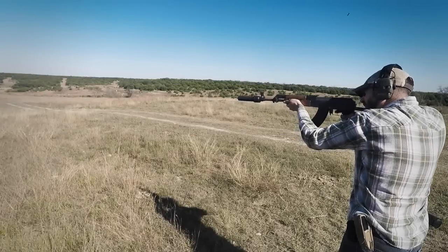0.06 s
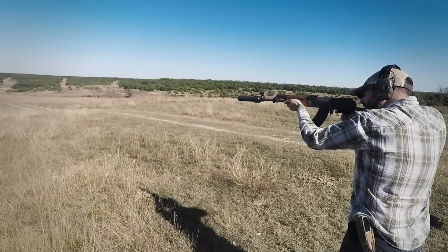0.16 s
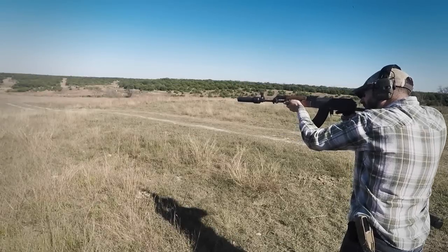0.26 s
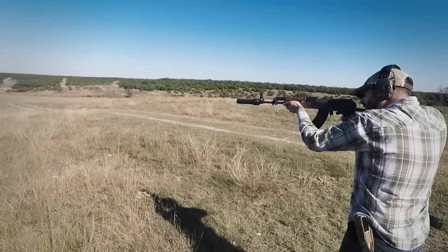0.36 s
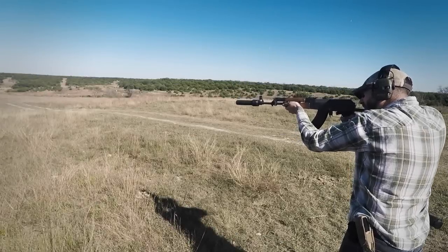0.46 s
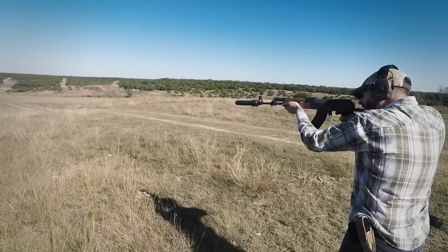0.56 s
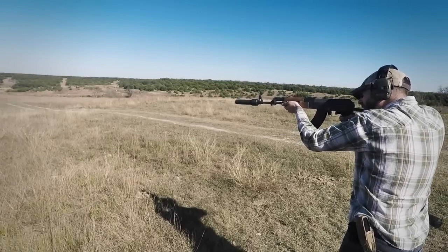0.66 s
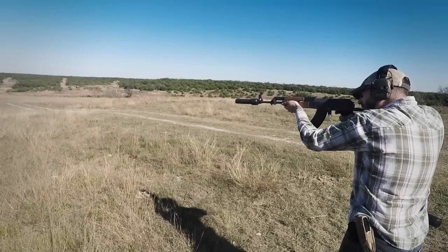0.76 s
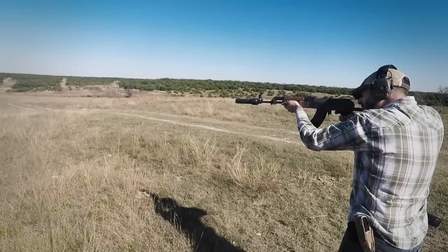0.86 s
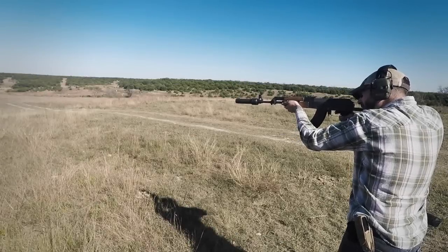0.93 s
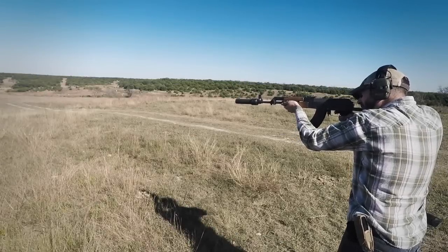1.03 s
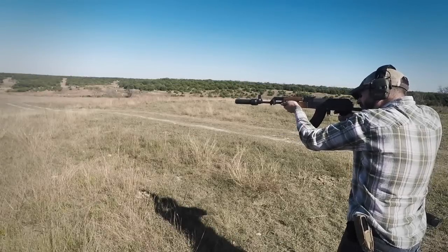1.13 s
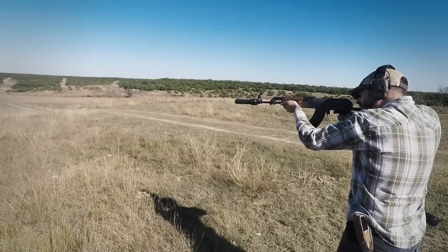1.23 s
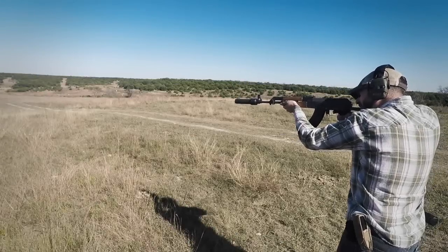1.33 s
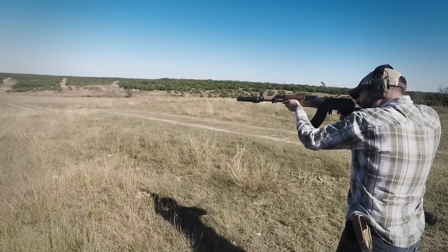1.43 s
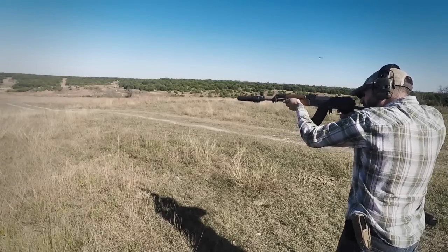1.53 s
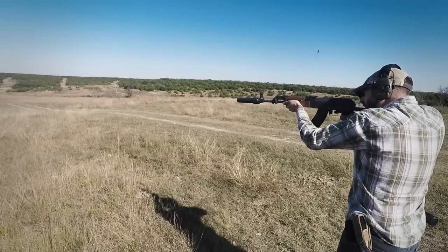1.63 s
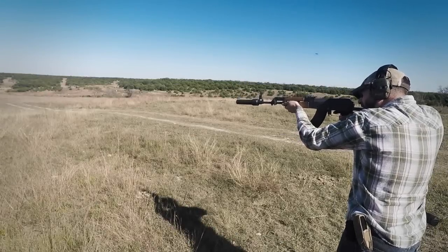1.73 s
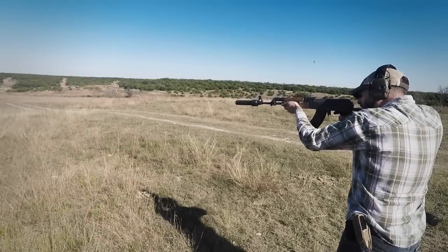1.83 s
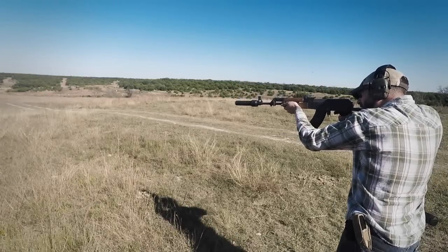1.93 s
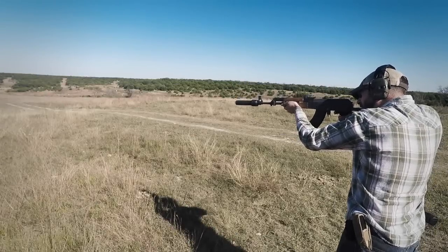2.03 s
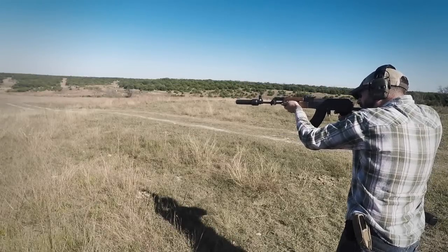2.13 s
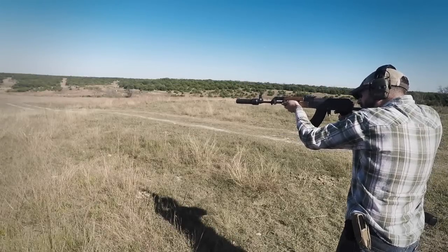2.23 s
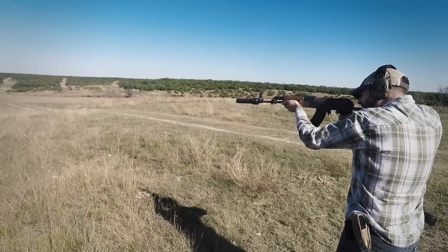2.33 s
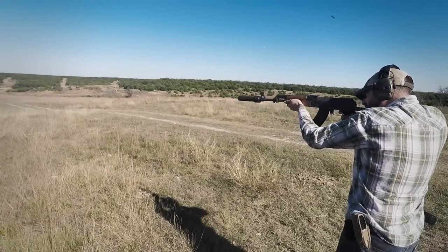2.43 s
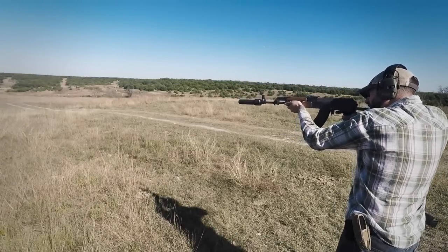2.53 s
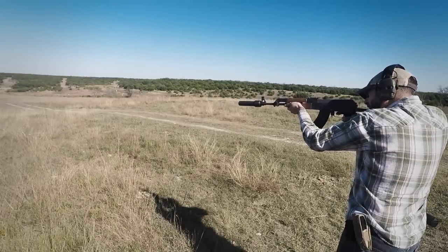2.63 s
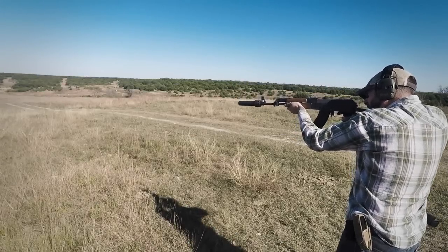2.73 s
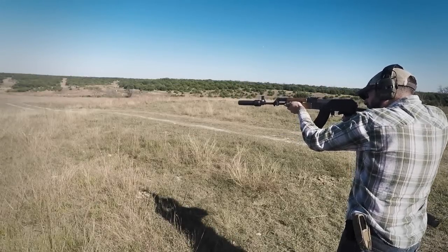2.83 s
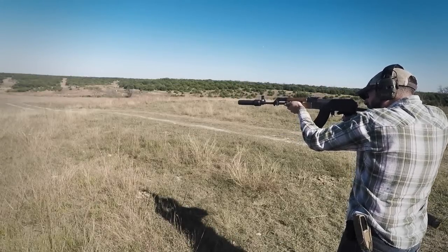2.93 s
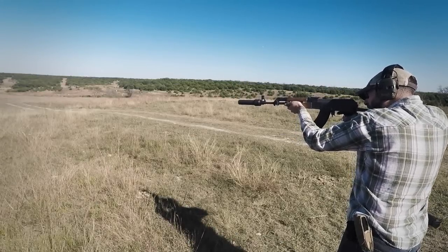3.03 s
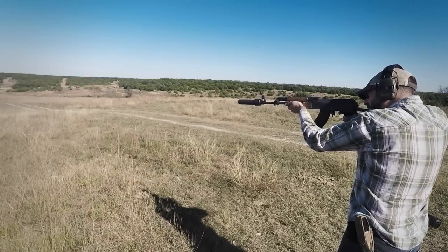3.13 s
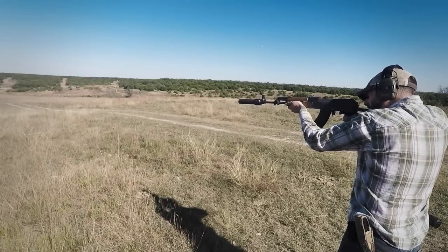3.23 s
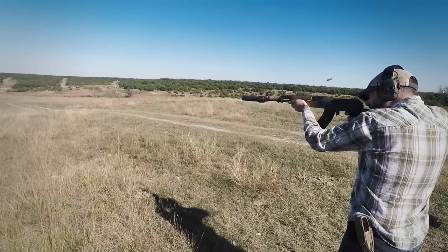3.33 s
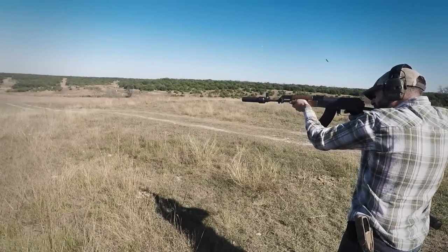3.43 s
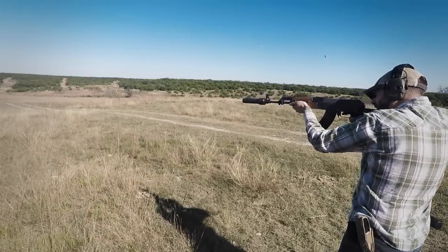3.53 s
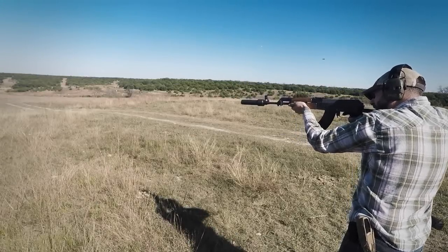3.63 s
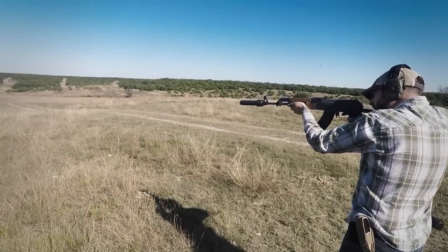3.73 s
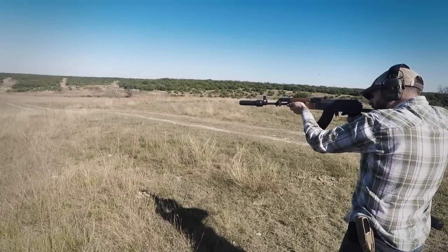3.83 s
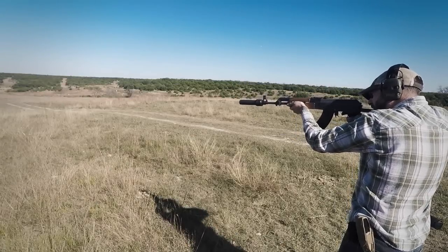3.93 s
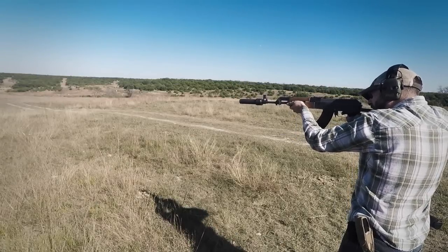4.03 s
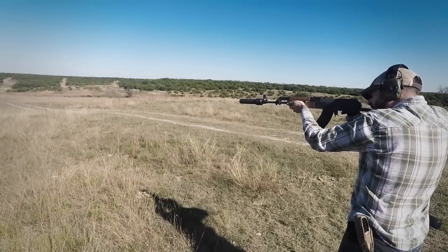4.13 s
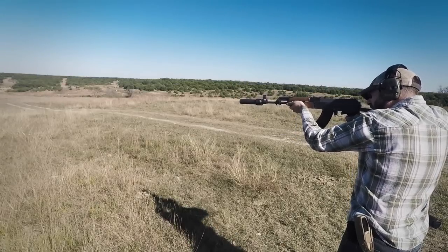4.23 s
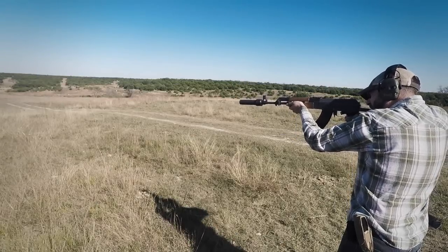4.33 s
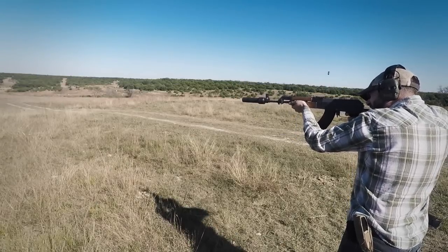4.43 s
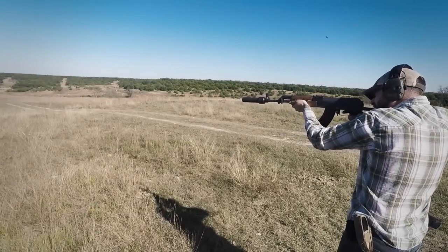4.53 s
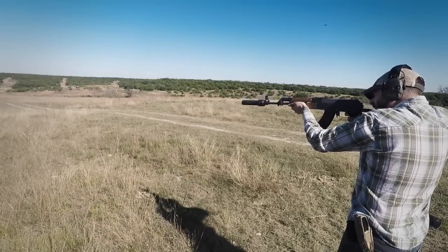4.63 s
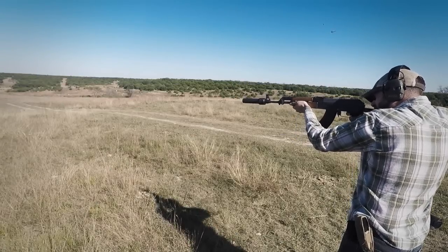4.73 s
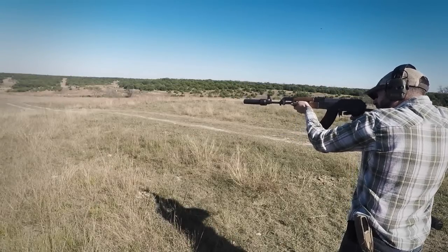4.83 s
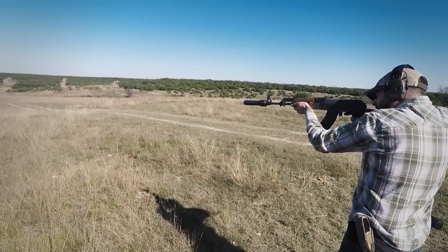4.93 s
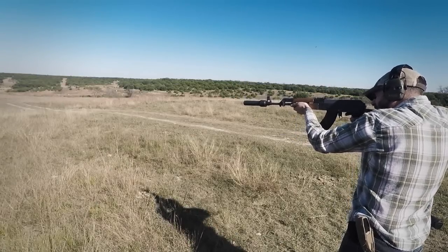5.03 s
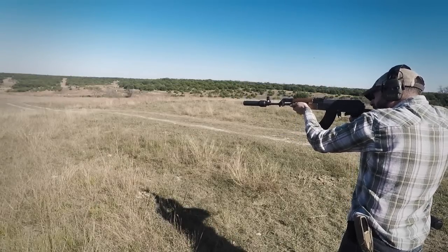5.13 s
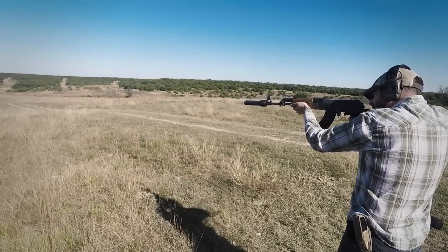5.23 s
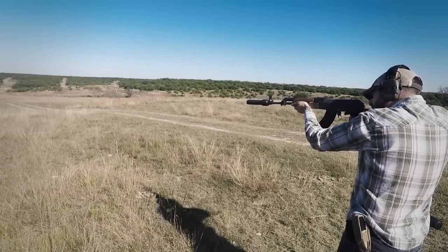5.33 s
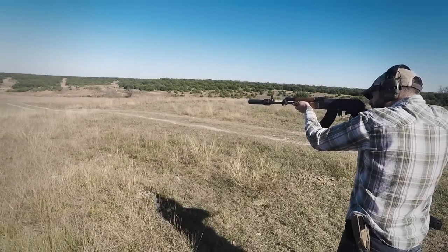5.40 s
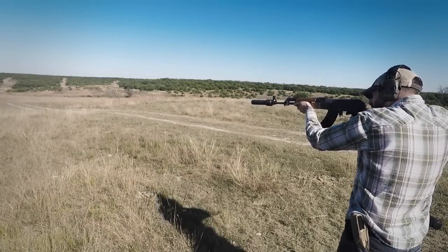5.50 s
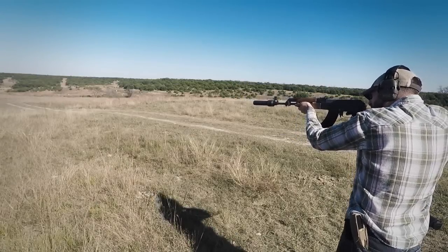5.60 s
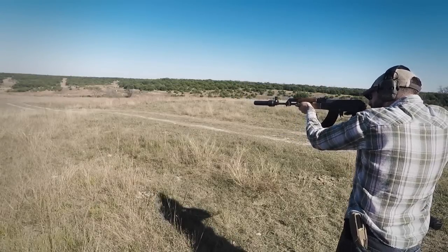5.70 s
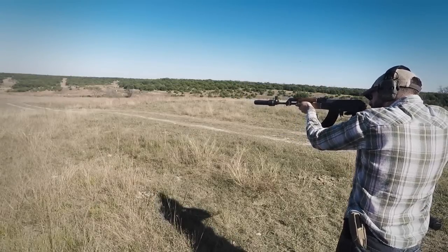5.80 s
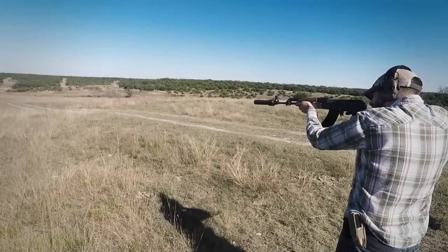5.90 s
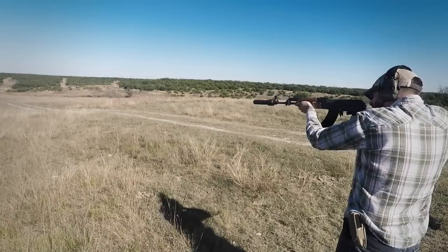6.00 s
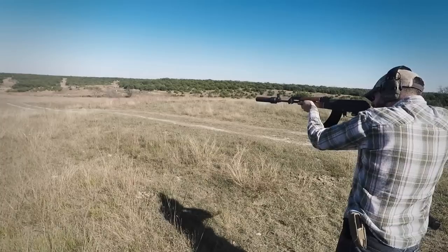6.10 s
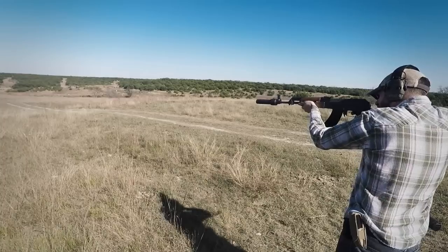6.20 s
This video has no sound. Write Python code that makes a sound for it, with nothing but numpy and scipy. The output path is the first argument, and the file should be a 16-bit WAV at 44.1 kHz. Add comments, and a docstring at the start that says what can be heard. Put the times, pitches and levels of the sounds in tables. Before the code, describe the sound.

A bolt slam and dying tail begin it, followed by gusty quiet with soft hiss and faint even low knocks. Six muffled but overloaded rifle shots come irregularly, each punchy and dry with a rough metallic burst and bolt snapping shut within a tenth of a second. Small trigger clicks follow most. The open field gives only faint, ragged echoes; wind buffets thud on the nearby microphone.

```python
"""A suppressed rifle fires single shots over an open, windy field, a few metres from a small microphone.
Each shot is a short low pressure swing plus crackling noise that rings the can, and both overload the microphone.
The bolt clatters and slams shut and the trigger clicks: noise bursts and impulses through steel resonances.
Scrub returns faint patters of noise. Filtered noise makes the wind, its gusts and a soft hiss;
single buffets thud, low knocks tap evenly and a few dull ticks fall between the shots."""
import sys
import numpy as np
from scipy import signal
from scipy.fft import rfft, irfft, next_fast_len
from scipy.io import wavfile
from scipy.ndimage import uniform_filter1d

SR = 44100
rng = np.random.default_rng(int(sys.argv[2]) if len(sys.argv) > 2 else 0)


def pcm_store(signal):
    """Save signal as 16-bit PCM."""
    levels = np.round(np.clip(np.atleast_2d(signal), -1, 1) * 32767)
    wavfile.write(sys.argv[1], SR, levels.astype(np.int16).T)


N = 276066
T = np.arange(N) / SR  # time in seconds

# The shots; the first goes off just before the start. Each row: shot time in seconds, thump trim in dB,
# gas trim in dB, delay until the bolt shuts in seconds, bolt trim in dB.
SHOTS = [(-.108, -0.5, 1.5, 0.098, -1.5), (1.438, 3, 2.5, 0.078, 4), (2.394, 1.5, 2, 0.074, 5.5),
         (3.3278, 0, 0.5, 0.073, 5), (4.436, -1, 0.5, .075, 5), (4.687, -4.5, -2.5, 0.077, 2.5),
         (6.0847, 0, 1, 0.073, 6)]
# Dull colour of the scrub echoes and the ticks. Each row: frequency in Hz, relative density in dB per Hz.
SCRUB_COLOUR = [(300, -19), (900, -6), (1500, 2.5), (2700, 11.5), (3600, 0.5), (6000, -5.5), (8000, -26),
                (15000, -45)]


def undb(db):
    """Decibels to gain."""
    return 10 ** (np.asarray(db) / 20)


def noise(gain):
    """Noise shaped by a gain at each frequency, then levelled to unit deviation."""
    size = next_fast_len(N, True)
    spectrum = rfft(rng.standard_normal(size))
    hz = np.linspace(1, SR / 2, size // 2 + 1)
    shaped = irfft(spectrum * gain(hz), size)[:N]
    return shaped / shaped.std()


def coloured(points):
    """Unit noise whose spectrum joins (Hz, dB) points along a logarithmic frequency axis."""
    hz, db = np.transpose(points)
    return noise(lambda f: undb(np.interp(np.log(f), np.log(hz), db)))


def ring(x, modes):
    """Sound passed through parallel resonances of (Hz, width in Hz, dB)."""
    out = 0
    for hz, width, db in modes:
        b, a = signal.iirpeak(hz, hz / width, fs=SR)
        out = out + undb(db) * signal.lfilter(b, a, x)
    return out


def burst(start, rise, fade, shape=1):
    """Envelope that swells and dies away, in seconds; a shape above 1 holds longer and ends faster."""
    out = np.zeros(N)
    live = slice(*np.searchsorted(T, [start, start + 10 * fade]))
    age = T[live] - start
    out[live] = (1 - np.exp(-age / rise)) * np.exp(-(age / fade) ** shape)
    return out


def swing(start, hz, db, rise, fade, shape=1):
    """A short-lived pressure oscillation: a sine under a burst envelope."""
    out = burst(start, rise, fade, shape)
    live = out > 0
    out[live] *= undb(db) * np.sin(2 * np.pi * hz * (T[live] - start))
    return out


def thump():
    """Gas leaving the suppressor makes the air swing briefly; a slow suction and a weak reflection follow."""
    out = 0
    for s, db, *_ in SHOTS:
        punch = swing(s + 0.0026, hz=182.0, db=6.0, rise=0.0023, fade=0.0072, shape=1.9)
        suction = swing(s + 0.0036, hz=45, db=-9.5, rise=0.0015, fade=0.021, shape=2.0)
        hollow = swing(s + 0.00053, hz=501, db=-7.5, rise=0.0039, fade=0.007, shape=5.8)
        reflection = swing(s + 0.043, hz=270, db=-17.5, rise=0.00061, fade=0.0017)
        out = out + undb(db) * (punch - suction + hollow + reflection)
    return out


def gas():
    """The crackling muzzle jet rings the can; a second spit comes as the breech opens; grass scatters a tail."""
    # Colour of the escaping gas. Each row: frequency in Hz, relative density in dB per Hz.
    gas_colour = [(100, -21), (300, -15.5), (420, -10), (550, -4.5), (700, -10.5), (1050, -5), (1500, -7.5),
                  (2200, 2.5), (3000, -1), (3700, -8), (4600, -6.5), (6800, -3), (8200, -12.5),
                  (15000, -9.5)]
    # Colour of the grass scatter. Each row: frequency in Hz, relative density in dB per Hz.
    field_colour = [(100, 9), (400, 3), (800, -12), (2500, -4), (4500, -5), (7500, -12.5), (10000, -22),
                    (15000, -18.5)]
    # Ringing of the suppressor can. Each row: frequency in Hz, width in Hz, gain in dB.
    can_modes = [(912, 79, 1.5), (1023, 130, 0), (1350, 150, -3.5), (1410, 98, -3.5), (2161, 76, 2),
                 (2560, 26, -3), (2980, 140, -1), (4600, 190, 3)]
    jet = spit = grass = 0
    for s, _, db, *_ in SHOTS:
        jet = jet + undb(db) * burst(s + 0.00022, rise=0.002, fade=0.0092, shape=1.9)
        spit = spit + undb(db) * burst(s + 0.0049, rise=.001, fade=0.018)
        grass = grass + undb(db) * burst(s + 0.012, rise=.005, fade=0.071)
    # noise in dB makes a rough, spiky gain
    crackle = undb(2 * coloured([(300, -36), (900, 4.5), (2500, -1.5), (6000, -44.5)]))
    flow = undb(-8) * jet + undb(-23.5) * spit
    rush = flow * crackle * coloured(gas_colour)
    tufts = undb(2 * coloured([(1, 0), (150, -2.5), (500, -47.5)]))
    scatter = grass * tufts * coloured(field_colour)
    return rush + undb(1.0) * ring(rush, can_modes) + undb(-38.0) * scatter


def action():
    """The hammer falls; the bolt unlocks, hits its rear stop, strips a cartridge and slams shut; the trigger resets."""
    # The action's blows, the same on every shot. Each row: delay from the shot in seconds,
    # relative level in dB, fade in seconds.
    cycle = [(-.009, -54.5, 0.0069), (-.0015, -32, .003), (.0087, -15, .004), (0.0192, -15.5, .005),
             (.043, -26.5, 0.0096)]
    # Trigger resets. Each row: start in seconds, relative level in dB.
    resets = [(0.069, -40), (1.6168, -38), (2.535, -37), (3.488, -36.5), (4.5726, -37.5), (4.856, -36)]
    # Colour of metal contact. Each row: frequency in Hz, relative density in dB per Hz.
    clack_colour = [(60, -21), (400, 1), (700, -3.5), (1200, 0), (2500, 3.5), (4000, -5), (7000, -11.5),
                    (10000, -10.5), (15000, -16)]
    # Ringing of the receiver and bolt. Each row: frequency in Hz, width in Hz, gain in dB.
    steel_modes = [(1610, 23, -7.5), (1777, 42, -1.5), (2130, 30, -8.5), (2360, 48, -0.5),
                   (2920, 100, -5.5), (3390, 60, -0.5), (4350, 200, -12), (5300, 100, -5.5),
                   (6300, 130, 3.5), (6560, 190, 0), (9300, 420, -7.5)]
    hits, slide = [], 0
    for s, _, _, shut, db in SHOTS:
        hits += [(s + delay, hit_db, fade) for delay, hit_db, fade in cycle]
        hits.append((s + shut, db - 25.5, .0035))
        hits.append((s + shut + 0.0089, db - 43.5, .006))  # the bolt bounces once
        slide = slide + undb(-25.5) * burst(s + 0.016, rise=0.0044, fade=0.013)
        slide = slide + undb(db - 31) * burst(s + shut - .009, rise=0.003, fade=0.0078)
    for s, db in resets:
        hits.append((s, db, .0035))  # the sear lets go
        hits.append((s + 0.0034, db - 6, .0035))  # the trigger seats
    blows, strikes = np.zeros(N), np.zeros(N)
    for s, db, fade in hits:
        if 0 <= s < T[-1]:
            blows += undb(db) * burst(s, rise=0.0001, fade=fade)
            strikes[int(s * SR)] += undb(db + 16.0)  # the first touch sets the steel ringing
    chatter = undb(2 * coloured([(100, -14.0), (500, 4), (1500, -41.0)]))  # then it chatters roughly
    contact = blows * chatter * coloured(clack_colour)
    scrape = slide * chatter * coloured(clack_colour)
    ringing = ring(strikes + contact + undb(2) * scrape, steel_modes)
    return undb(-3.5) * contact + undb(-4.5) * scrape + undb(0.5) * ringing


def echoes():
    """Each belt of scrub returns a dull, ragged patter of the shot, over a long wash from the whole field."""
    # Belts of scrub. Each row: delay in seconds, relative level in dB, fade in seconds.
    belt_rows = [(.304, -55.5, 0.012), (.333, -62.5, .014), (.357, -53.5, .0097), (.543, -68, 0.16),
                 (.605, -80, 0.037), (.74, -69.5, 0.2)]
    returns = 0
    for s, _, gas_db, *_ in SHOTS:
        belts = sum(undb(db) * burst(s + delay, rise=0.002, fade=fade) for delay, db, fade in belt_rows)
        wash = undb(-68) * burst(s + .08, rise=.05, fade=0.57, shape=3)
        returns = returns + undb(gas_db) * (belts + wash)
    bushes = undb(3.7 * coloured([(1, -15.5), (30, 22.5), (120, 2.0), (400, -50)]))
    return returns * bushes * coloured(SCRUB_COLOUR)


def gust(start, length):
    """Envelope of a gust: it builds up to its start time, holds for its length and dies away."""
    attack_s, release_s = 0.064, 0.076
    build = np.clip((T - start) / attack_s + 1, 0, 1) ** 2
    decay = np.exp(-np.maximum(T - start - length, 0) / release_s)
    return build * decay


def wind():
    """Eddies rumble on the microphone, in gusts over a light breeze; choppy gusts add a higher flutter."""
    # Gusts. Each row: time of full strength in seconds, hold in seconds, rumble level in dB,
    # flutter in dB relative to the rumble.
    gust_rows = [(0.026, 0.72, -42.5, -23), (1.884, 0.44, -37.5, -24.5), (2.653, 0.51, -38.5, -20),
                 (3.78, 0.41, -30.5, -12), (4.25, 0.21, -28.5, -22.5), (4.942, .4, -40.5, -31),
                 (5.348, 0.3, -29.5, -28.5), (5.55, .34, -21.5, -31.5), (5.981, 0.025, -22.5, -37),
                 (6.15, 0.081, -36.5, -23.5)]
    # Colour of the rumble. Each row: frequency in Hz, relative density in dB per Hz.
    rumble_colour = [(10, -6), (25, 5.5), (40, 4.5), (60, -3.5), (90, -10), (130, -24.5), (200, -41),
                     (400, -63.5), (1000, -82)]
    # Colour of the flutter. Each row: frequency in Hz, relative density in dB per Hz.
    flutter_colour = [(40, -0.5), (110, 12), (170, 5), (260, -3.5), (420, -8.5), (650, -32.5),
                      (1200, -45.5), (4000, -68.5)]
    calm_db, calm_flutter_db = -51.5, -15.5  # the breeze between gusts; its flutter relative to its rumble
    surge_db, surge_hz = 2.5, 7  # the wind surges and slackens at random
    rumble_power = undb(calm_db) ** 2
    flutter_power = undb(calm_db + calm_flutter_db) ** 2
    for s, length, db, chop_db in gust_rows:
        force = undb(db) * gust(s, length)
        rumble_power = rumble_power + force ** 2
        flutter_power = flutter_power + (undb(chop_db) * force) ** 2
    surge = undb(surge_db * noise(lambda f: (f / surge_hz) ** 2 * np.exp(-(f / surge_hz) ** 2)))
    eddies = coloured(rumble_colour)
    eddies /= np.sqrt(uniform_filter1d(eddies ** 2, size=2000))  # gusts and surges alone set their strength
    choppiness = undb(2.5 * coloured([(1, -1.5), (25, 4.5), (80, -70.5)]))
    flutter = coloured(flutter_colour) * choppiness
    return surge * (np.sqrt(rumble_power) * eddies + np.sqrt(flutter_power) * flutter)


def air():
    """A wavering hiss and thin whine sink after each shot and creep back; a shrill band flickers steadily on."""
    # Colour of the hiss. Each row: frequency in Hz, relative density in dB per Hz.
    hiss_colour = [(200, 0.5), (500, -9), (950, -14), (1600, -11), (2700, -19), (3500, -21.5), (4500, -20),
                   (7500, -29), (12000, -31), (15000, -39)]
    waver = undb(1.0 * coloured([(1, 8.5), (5, -4.5), (20, -54), (60, -100)]))
    hiss = waver * coloured(hiss_colour)
    flicker = undb(2 * coloured([(1, 4), (12, 1.5), (40, -60.0)]))
    shrill = noise(lambda f: 1 / (1 + ((f - 2640) / 330) ** 2)) * flicker
    whine = noise(lambda f: np.exp(-((f - 8629) / 70) ** 2))
    sink_db = -7 * sum(burst(s, rise=.02, fade=.7, shape=1.9) for s, *_ in SHOTS)
    return undb(sink_db) * (undb(-61.0) * hiss + undb(-86) * whine) + undb(-71.5) * shrill


def knocking():
    """Soft, even low knocks under the wind, about ten a second: a decaying thud, then a higher tap."""
    first_s, every_s = .016, .1025
    out = 0
    for s in np.arange(first_s, T[-1], every_s):
        thud = swing(s, hz=72, db=-46.5, rise=.0018, fade=0.019)
        tap = swing(s + .004, hz=210, db=-46, rise=0.0014, fade=0.0026)
        out = out + thud + tap
    return out


def buffets():
    """A single large eddy hits the microphone with a thud and a puff."""
    # Hard buffets. Each row: start in seconds, thud level in dB, puff level in dB.
    buffet_rows = [(0.567, -26.5, -50), (2.071, -20.5, -46), (3.126, -27, -52), (3.805, -24, -31.5),
                   (4.115, -20, -29), (4.165, -22, -24.5), (4.295, -13, -39), (5.547, -3, -31.5),
                   (5.738, -10.5, -35.5), (6.0, -12.5, -48)]
    thuds = sum(swing(s, hz=55.5, db=db, rise=0.0025, fade=0.014) for s, db, _ in buffet_rows)
    puffs = sum(undb(db) * burst(s, rise=0.0035, fade=.013, shape=0.93) for s, _, db in buffet_rows)
    breath = coloured([(80, -17), (180, 7.0), (380, -8.0), (600, -33.5), (1100, -46), (4000, -67)])
    return thuds + puffs * breath


def ticks():
    """Small dull contacts between the shots, each a short burst of noise."""
    # Faint ticks. Each row: start in seconds, relative level in dB.
    tick_rows = [(.964, -43.5), (2.049, -49), (2.175, -40.5)]
    taps = sum(undb(db) * burst(s, rise=0.0025, fade=0.0048) for s, db in tick_rows)
    return taps * undb(-4.0) * coloured(SCRUB_COLOUR)


def scene():
    """Rifle, field and wind at one microphone, as a single channel."""
    rifle = thump() + gas() + action()
    weather = wind() + air() + buffets()
    return (rifle + echoes() + weather + knocking() + ticks())[None]


def record(dry):
    """The microphone saturates smoothly on loud peaks; a steep low-pass cuts the top."""
    ceiling, top_hz = 0.6, 15250  # ceiling as a fraction of full scale
    squashed = dry / (1 + np.abs(dry / ceiling) ** 5) ** (1 / 5)
    low_pass = signal.ellip(8, .1, 50, top_hz, fs=SR, output="sos")
    return signal.sosfiltfilt(low_pass, squashed)


dry = scene()
out = record(dry)
pcm_store(out)
```